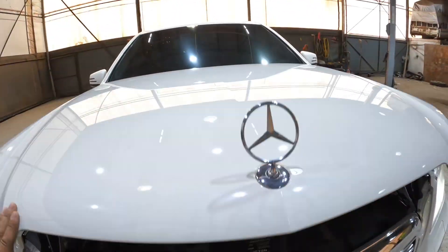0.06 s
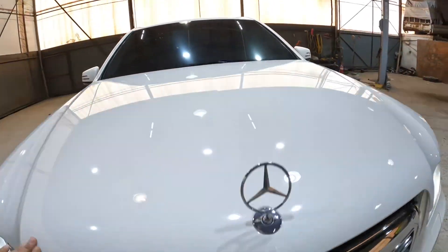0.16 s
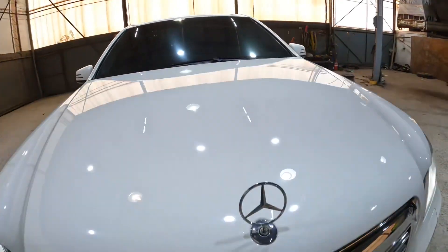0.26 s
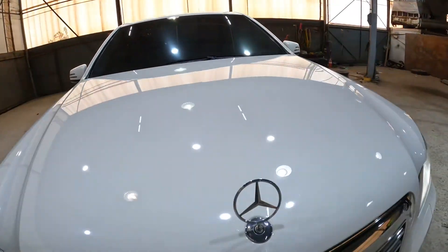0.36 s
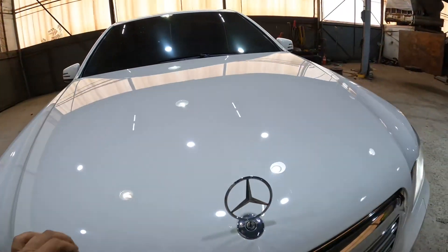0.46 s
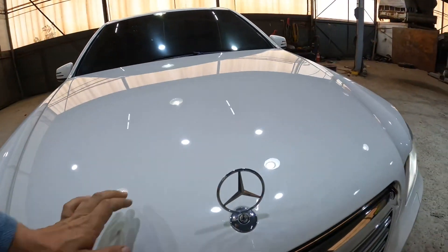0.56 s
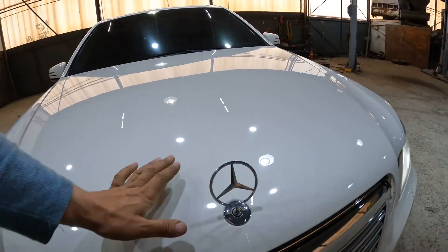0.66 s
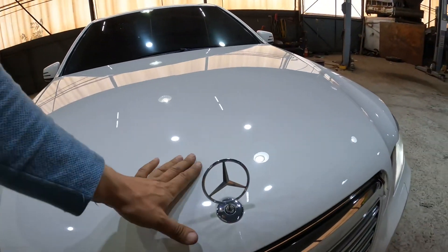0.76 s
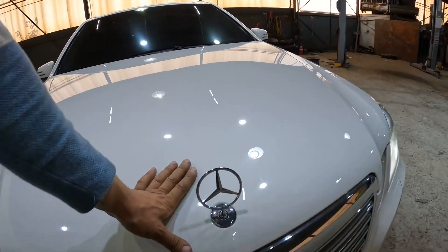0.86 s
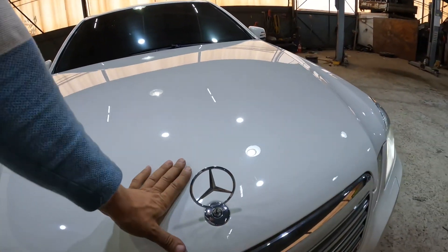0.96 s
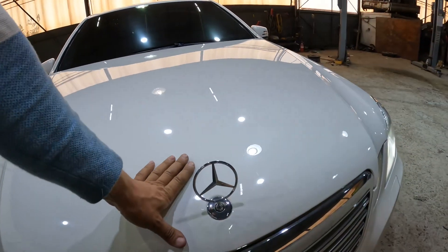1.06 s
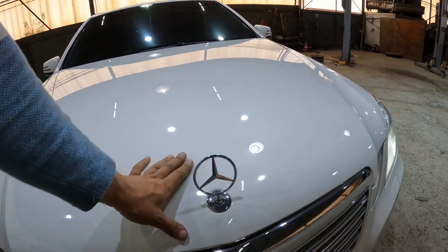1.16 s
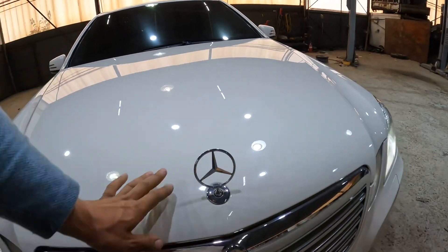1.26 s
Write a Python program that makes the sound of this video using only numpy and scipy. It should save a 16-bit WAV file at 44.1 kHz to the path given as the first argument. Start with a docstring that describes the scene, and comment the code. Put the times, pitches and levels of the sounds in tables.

```python
"""In a large shed, a car hood drops onto its safety catch, bounces, and is then pressed home by hand.
Each contact is shaped noise: a bright steel clack and a dull thud, with a wash of echo from the shed.
Fading tones make the panel boom and the catch, lock, spring and lever ring.
An idling engine, made of low tones and noise, runs throughout and is muffled once the hood is down."""
import sys
import numpy as np
from scipy import signal
from scipy.io import wavfile

SR = 44100
rng = np.random.default_rng(int(sys.argv[2]) if len(sys.argv) > 2 else 0)


def unload_wav(signal):
    """Save mono or channel-first audio to the path in sys.argv[1] as 16-bit WAV at rate SR, clipped to [-1, 1]."""
    wavfile.write(
        sys.argv[1],
        SR,
        np.round(np.clip(np.atleast_2d(signal).T, -1, 1) * 32767).astype(np.int16),
    )


N = 59535
T = np.arange(N) / SR  # time of every sample in seconds

# A "60 dB fade" is the time a sound takes to die away by 60 dB.
# Contacts of hood, catch and buffers. Each row: start in seconds, thud level in dB,
# clack level in dB at the tilt pivot, clack 60 dB fade in seconds, clack tilt in dB per octave.
CONTACTS = [(0.2616, -15.5, -8.5, 0.036, -2.5), (0.274, -13, -22.5, 0.1, -2.5),
            (0.2826, -15, -21, 0.097, -1), (0.288, -9.5, -15, 0.078, 1.3), (0.2923, -13, -16, 0.053, 1.5),
            (0.3055, -11.5, -18.5, 0.11, -1.8), (0.314, -35.5, -20.5, 0.068, 0.5),
            (0.3226, -33, -13, 0.032, -1), (0.3474, -35, -16.5, 0.045, -2.5),
            (0.408, -12.5, -21, 0.046, -1.3), (.4625, -19.5, -31.5, 0.047, 1), (.492, -31, -36, 0.29, -5),
            (.602, -25, -51, 0.043, -2), (0.827, -59, -44, 0.147, -9.5), (.947, -26.5, -39, 0.097, -9),
            (0.9569, -16.5, -14, .04, -3), (0.9583, -23, -15.5, 0.032, 3),
            (0.9677, -17.5, -16.5, 0.042, 0.2), (0.9798, -14.5, -23, 0.072, 0),
            (1.076, -34, -42, 0.091, -5), (1.1185, -24.5, -39, 0.13, -6.5),
            (1.146, -26, -33.5, 0.023, -0.5)]
CLACK_RISE_S, THUD_RISE_S, THUD_FADE_S = .0012, .0015, .13
TILT_FROM_HZ, TILT_PIVOT_HZ = 850, 2930  # below the first, the tilt stays constant
# Tone colour of the clacks. Each row: frequency in Hz, relative level in dB per Hz.
CLACK_COLOUR = [(40, -44.5), (250, -6), (700, -7), (1700, 0), (2400, -2), (3200, -1.5), (4200, -5),
                (5500, -3.5), (7500, -12.5), (8800, -24.5), (10200, -15), (13000, -28.5), (15500, -52)]
# Tone colour of the thuds. Each row: frequency in Hz, relative level in dB per Hz.
THUD_COLOUR = [(30, -19), (60, -11.5), (110, -2.5), (190, -2), (280, -6.5), (370, -9), (550, -13),
               (850, -13.5), (1500, -21), (3000, -27), (8000, -62)]

# Tones of the hood loose on its catch. Each row: frequency in Hz, level in dB, 60 dB fade in seconds.
LOOSE_MODES = [(108.1, -18.5, 0.54), (172.14, -19, 0.97), (203.9, -18, 0.67), (259, -21, 0.57),
               (355.3, -12.5, 0.33), (430, -29, .6), (511, -30, 0.97), (729, -33.5, 1), (773, -24, 0.43),
               (1030, -28, 0.58), (1148.3, -26.5, 0.39), (1415, -31, 0.27), (2020, -25.5, 0.33),
               (2040, -35, 0.3)]
LOOSE_START_S, LOOSE_RISE_S = .2865, .0068
# Tones of the hood clamped by the lock. Each row: frequency in Hz, level in dB, 60 dB fade in seconds.
CLAMPED_MODES = [(74.3, -5.5, 0.27), (109.4, -6.5, 0.3), (144.3, -28, 0.75), (170, -36, 0.36),
                 (245.2, -23.5, 0.45), (268, -31, 0.42), (365.6, -10.5, 0.13), (415, -19.5, 0.24),
                 (462.5, -24, .18), (669.6, -23.5, 0.2), (911, -16.5, 0.12)]
CLAMPED_START_S, CLAMPED_RISE_S = .96, .0082
# Heaves of the whole panel on its buffers.
# Each row: start in seconds, frequency in Hz, level in dB, rise in seconds, 60 dB fade in seconds.
HEAVES = [(0.328, 86.6, -0.5, 0.003, 0.13), (0.346, 92.7, -24, 0.019, 0.88), (.44, 42.07, -16, 0.044, 0.83),
          (0.9, 37.5, -20, 0.011, 0.23)]

# Tones of the safety catch. Each row: frequency in Hz, dB added to the strike, 60 dB fade in seconds.
CATCH_MODES = [(1424, -3, 0.019), (1820, -2.5, 0.028), (2240, -11, 0.022), (3090, -23, 0.09),
               (3164, 5.5, 0.022), (3590, -2.5, 0.035), (3850, -9, 0.0575), (5200, -3, 0.027),
               (5480, -8.5, 0.064), (7040, -19, .08), (7740, -6.5, 0.012)]
# Tones of the lock. Each row: frequency in Hz, dB added to the strike, 60 dB fade in seconds.
LOCK_MODES = [(1211, -5, 0.14), (1710, 3, 0.0736), (2124, -6.5, 0.055), (2605, -4.5, 0.062),
              (3062, -3.5, 0.12), (4944, 0, 0.041), (6000, -11, 0.046), (6500, -8, .03), (7540, -18, .08),
              (10020, -12, 0.056), (10330, -11, .06), (12300, -13, .025), (14000, -21, .025)]
# Tones of the spring. Each row: frequency in Hz, dB added to the strike, 60 dB fade in seconds.
SPRING_MODES = [(3110, -0.5, 0.035), (3224, -5.5, .05), (3480, -23.5, 0.027)]
# Strikes on the catch. Each row: start in seconds, level in dB.
CATCH_HITS = [(.2634, -9.5), (.2905, -17.5), (.311, -36.5)]
# Strikes on the lock. Each row: start in seconds, level in dB.
LOCK_HITS = [(.9595, -22.5), (.9685, -19.5)]
# Strikes on the spring. Each row: start in seconds, level in dB.
SPRING_HITS = [(1.118, -29.5), (1.145, -28)]
LOCK_PAN_DB = -3  # left minus right: the lock lies a little to the right
# Short clinks of the catch lever.
# Each row: start in seconds, frequency in Hz, level in dB, 60 dB fade in seconds.
CLINKS = [(.3485, 4160, -23.5, 0.053), (.355, 2970, -30.5, .05), (.409, 6350, -24, 0.0314),
          (0.4087, 7500, -34, 0.054)]

# Idle noise with the hood open. Each row: frequency in Hz, relative level in dB per Hz.
OPEN_COLOUR = [(25, -4.5), (55, -3.5), (120, -6.5), (240, -16), (480, -17), (750, -21.5), (1300, -19.5),
               (2200, -27), (3300, -29), (4500, -32.5), (5300, -33), (6200, -38), (7500, -31.5),
               (8800, -56), (10200, -41), (13500, -62), (15500, -75)]
# Idle noise with the hood shut. Each row: frequency in Hz, relative level in dB per Hz.
SHUT_COLOUR = [(25, 0.5), (45, -2), (100, -6.5), (200, -17), (400, -12), (700, -25), (1050, -17),
               (2000, -26), (3200, -29), (5500, -43.5), (7300, -38), (8700, -57), (10300, -50),
               (12000, -54), (13500, -64), (15500, -87)]
OPEN_DB, SHUT_DB = -27, -38  # overall noise level
SHUT_S, SHUTTING_S = .3, .22  # middle and spread in time of the muffling
FIRING_HZ, THROB = 37.38, .13  # firing rate, and the share by which the noise swells and sinks
# Engine tones. Each row: multiple of the firing rate, level in dB.
FIRING_TONES = [(1, -43.5), (2, -62), (3, -44)]
# Narrow hisses of the running engine.
# Each row: frequency in Hz, width in Hz, level in dB with the hood open, level in dB with it shut.
HISSES = [(5220, 380, -47.5, -63.5), (10070, 500, -63, -73), (1410, 240, -48, -64)]
HISS_WAVER, HISS_WAVER_S = .35, .008  # strength on a natural-log scale, smoothing in seconds

# How long the shed echoes. Each row: frequency in Hz, 60 dB fade in seconds.
SHED_FADE = [(60, 0.8), (300, 0.32), (1200, 0.88), (3500, 1.36), (7000, 0.97), (12000, 0.4)]
# How much sound goes into the echo. Each row: frequency in Hz, level in dB.
SHED_SEND = [(60, -10), (200, -6.5), (400, -2), (800, -5), (2000, -12), (5500, -11.5), (8500, -13),
             (10300, -11), (14000, -16)]
CLAMPED_SEND_DB, SHED_BUILD_S = -3.5, .037  # the clamped hood radiates less into the shed
# Width of diffuse sound. Each row: frequency in Hz, side minus middle level in dB.
SIDE_LEVEL = [(30, -18), (70, -35), (150, -32), (300, -15.5), (700, -7.5), (1200, -11), (2200, -6),
              (4000, -8), (6500, -9.5), (10500, -6)]
# Left-right balance. Each row: frequency in Hz, left minus right level in dB.
BALANCE = [(100, 0), (330, .6), (500, -1), (750, -1), (1400, 0.28), (3000, 1), (6000, 0), (8000, 5.5),
           (10200, 1.5), (13000, 6)]
DIRECT_SIDE_DB = -2  # sound straight from the car is narrower
MODE_SPREAD_RAD = .32  # typical phase shift of a high tone, opposite in the two ears

CUTOFF_HZ = 15200
EDGES = np.geomspace(22, 16000, 36)  # borders of the noise bands in Hz
CENTRES = np.sqrt(EDGES[1:] * EDGES[:-1])


def contacts():
    """Panel and steelwork have crowded tones, heard as bursts of noise with a shed echo."""
    start, thud_db, clack_db, clack_fade, tilt_db = np.transpose(CONTACTS)
    # Squared envelopes are powers, which add up simply.
    thuds = np.array([burst(s, THUD_RISE_S, THUD_FADE_S) for s in start]) ** 2
    clacks = np.array([burst(s, CLACK_RISE_S, fade) for s, fade in zip(start, clack_fade)]) ** 2
    thud_power = from_db(thud_db) ** 2 @ thuds
    send = np.where(T < CLAMPED_START_S, 1, from_db(CLAMPED_SEND_DB)) ** 2
    bands = zip(CENTRES, noise_bands(), band_gains(THUD_COLOUR), band_gains(CLACK_COLOUR))
    out = 0
    for hz, (mid, side), thud, clack in bands:
        octaves = np.log2(max(hz, TILT_FROM_HZ) / TILT_PIVOT_HZ)
        clack_power = (clack * from_db(clack_db + tilt_db * octaves)) ** 2 @ clacks
        direct = thud ** 2 * thud_power + clack_power
        # The echo builds up, then fades.
        building = lag(direct * send, SHED_BUILD_S)
        wash = lag(building, at_hz(SHED_FADE, hz) / (2 * np.log(1000)))
        wash = wash * from_db(at_hz(SHED_SEND, hz)) ** 2
        side_power = direct * from_db(DIRECT_SIDE_DB) ** 2 + wash
        out = out + mid * np.sqrt(direct + wash) + side * np.sqrt(side_power)
    return out


def panel():
    """The sheet of the hood rings at its own tones, first loose and then clamped, and heaves."""
    loose = sum(ring(LOOSE_START_S, hz, db, LOOSE_RISE_S, fade) for hz, db, fade in LOOSE_MODES)
    clamped = sum(ring(CLAMPED_START_S, hz, db, CLAMPED_RISE_S, fade)
                  for hz, db, fade in CLAMPED_MODES)
    heaves = sum(ring(*heave) for heave in HEAVES)
    return loose + clamped + heaves


def steel(hits, modes):
    """A small steel part rings at its own set of tones at each strike."""
    return sum(ring(s, hz, db + mode_db, .0004, fade)
               for s, db in hits for hz, mode_db, fade in modes)


def latch():
    """The struck steel of catch, lock and spring rings together."""
    lock_sides = from_db(LOCK_PAN_DB * np.array([[.5], [-.5]]))
    lock = steel(LOCK_HITS, LOCK_MODES) * lock_sides
    return steel(CATCH_HITS, CATCH_MODES) + lock + steel(SPRING_HITS, SPRING_MODES)


def lever_clinks():
    """The catch lever gives short single tones that start sharply and fade."""
    return sum(ring(s, hz, db, .00036, fade) for s, hz, db, fade in CLINKS)


def engine():
    """Firing gives steady low tones and throbbing noise; the closing hood muffles the noise."""
    opening = .5 - .5 * np.tanh((T - SHUT_S) / SHUTTING_S)  # 1 is open, 0 is shut
    spread = from_db(DIRECT_SIDE_DB * opening)
    phase = 2 * np.pi * FIRING_HZ * T
    noise = 0
    for (mid, side), bare, covered in zip(noise_bands(), band_gains(OPEN_COLOUR), band_gains(SHUT_COLOUR)):
        level = from_db(OPEN_DB) * bare * opening + from_db(SHUT_DB) * covered * (1 - opening)
        noise = noise + (mid + spread * side) * level
    noise = noise + hisses(opening, spread)
    hum = sum(from_db(db) * np.sin(round(k) * phase + rng.uniform(0, 2 * np.pi))
              for k, db in FIRING_TONES)
    return noise * (1 + THROB * np.sin(phase)) + hum


def hisses(opening, spread):
    """Noise through narrow filters gives the engine's hisses, which waver in level."""
    out = 0
    for hz, width, open_db, shut_db in HISSES:
        b, a = signal.iirpeak(hz, hz / width, fs=SR)
        once = signal.lfilter(b, a, rng.standard_normal((2, N)))
        mid, side = stereo_parts(signal.lfilter(b, a, once), hz)
        waver = lag(lag(rng.standard_normal(N), HISS_WAVER_S), HISS_WAVER_S)
        level = from_db(open_db) * opening + from_db(shut_db) * (1 - opening)
        level = level * np.exp(HISS_WAVER * waver / waver.std())
        out = out + (mid + spread ** 2 * side) * level
    return out


def ring(s, hz, db, rise, fade):
    """A struck tone swells and fades; higher tones reach the two ears less alike."""
    shift = rng.standard_normal() * MODE_SPREAD_RAD * min(hz / 600, 1) * np.array([[1], [-1]])
    tone = np.sin(2 * np.pi * hz * (T - s) + shift)
    return from_db(db) * pan(hz) * burst(s, rise, fade) * tone


def burst(s, rise, fade):
    """Loudness curve that swells from time s and dies away."""
    age = np.maximum(T - s, 0)
    return (1 - np.exp(-age / rise)) * np.exp(-np.log(1000) * age / fade)


def noise_bands():
    """Narrow bands of stereo noise, one after another, as middle and side parts."""
    lead_in = SR // 10  # dropped once the filter has settled
    white = rng.standard_normal((2, 2, N + lead_in))
    for k, hz in enumerate(CENTRES):
        band = signal.butter(2, EDGES[k:k + 2], "band", fs=SR, output="sos")
        # Neighbouring bands use different noise.
        pair = signal.sosfilt(band, white[k % 2])[:, -N:]
        yield stereo_parts(pair, hz)


def stereo_parts(pair, hz):
    """Two noises of equal strength become a middle part and a weaker side part, opposite in the ears."""
    mid, side = pair / pair.std(axis=1, keepdims=True)
    side_gain = from_db(at_hz(SIDE_LEVEL, hz))
    return pan(hz) * mid, pan(hz) * side_gain * side * [[1], [-1]]


def band_gains(colour):
    """Gain of each noise band for a tone colour, with total power 1."""
    gains = from_db(at_hz(colour, CENTRES)) * np.sqrt(np.diff(EDGES))
    return gains / np.linalg.norm(gains)


def pan(hz):
    """Left and right gains at a frequency."""
    return from_db(at_hz(BALANCE, hz) * np.array([[.5], [-.5]]))


def lag(x, seconds):
    """Smooth a signal so that it follows changes slowly."""
    keep = np.exp(-1 / (seconds * SR))
    return signal.lfilter([1 - keep], [1, -keep], x + 1e-18)


def at_hz(points, hz):
    """Read a table between its rows, with frequency spaced in octaves."""
    table_hz, value = np.transpose(points)
    return np.interp(np.log(hz), np.log(table_hz), value)


def from_db(db):
    """Turn decibels into a gain."""
    return 10 ** (np.asarray(db) / 20)


def scene():
    """Hood, latch and engine sound together."""
    return contacts() + panel() + latch() + lever_clinks() + engine()


def record(dry):
    """Peaks are rounded off and the highest treble is cut."""
    top = 1.13
    rounded = top * np.tanh(dry / top)
    low_pass = signal.ellip(10, .1, 80, CUTOFF_HZ, fs=SR, output="sos")
    return signal.sosfilt(low_pass, rounded)


dry = scene()
out = record(dry)
unload_wav(out)
```